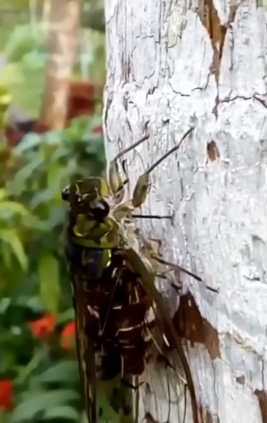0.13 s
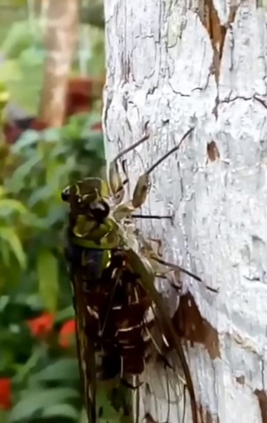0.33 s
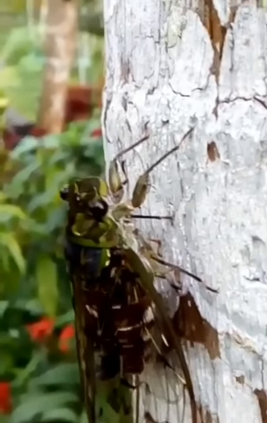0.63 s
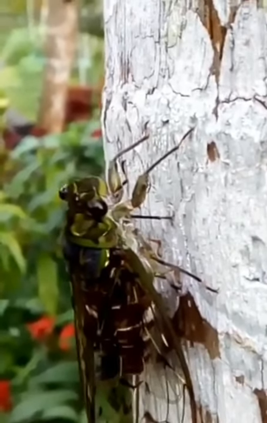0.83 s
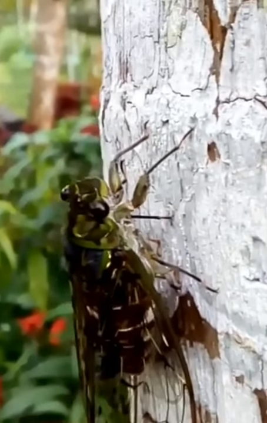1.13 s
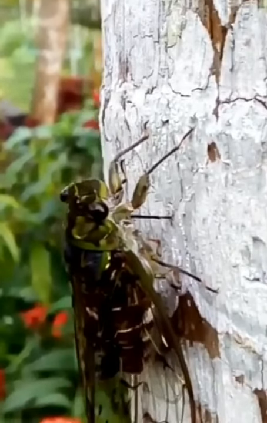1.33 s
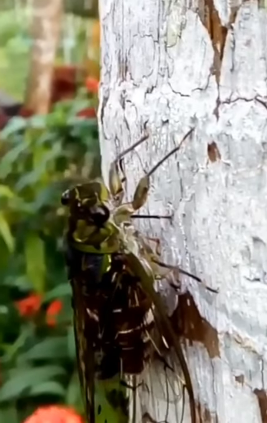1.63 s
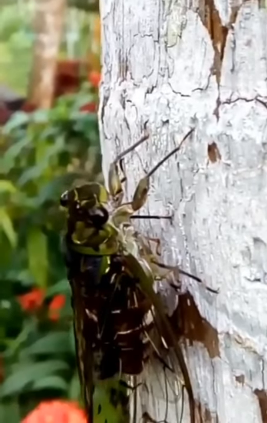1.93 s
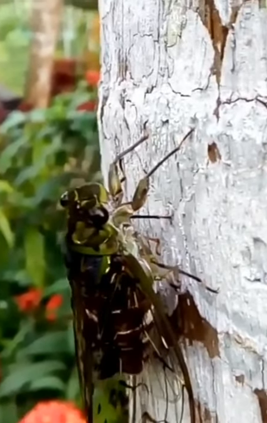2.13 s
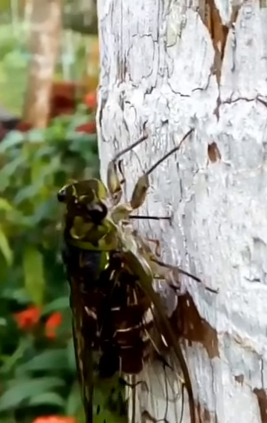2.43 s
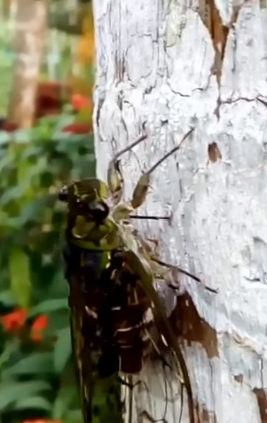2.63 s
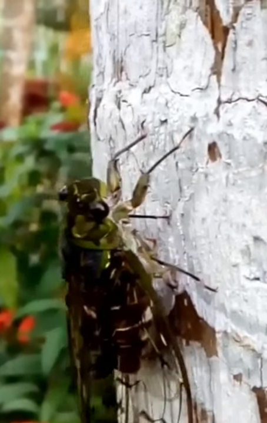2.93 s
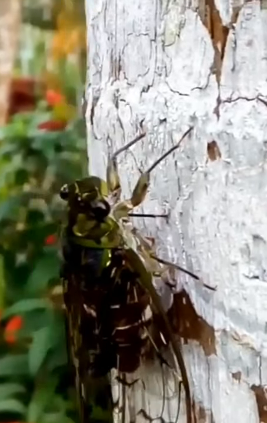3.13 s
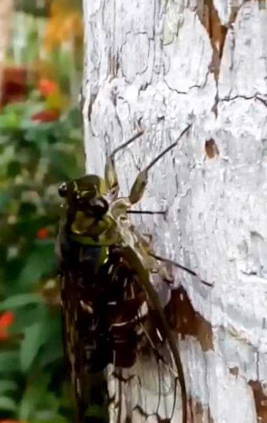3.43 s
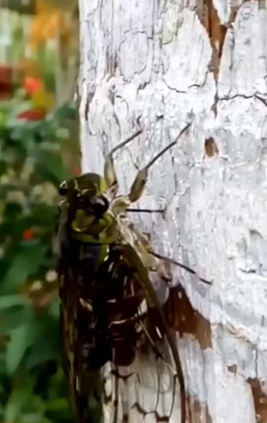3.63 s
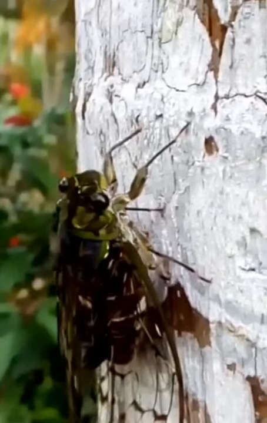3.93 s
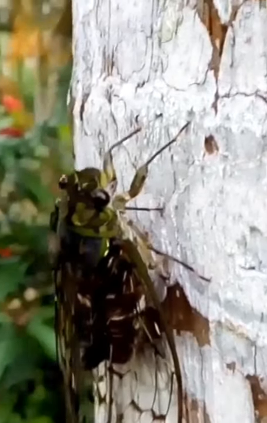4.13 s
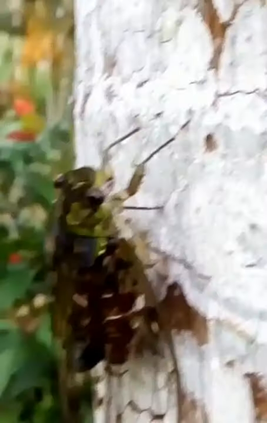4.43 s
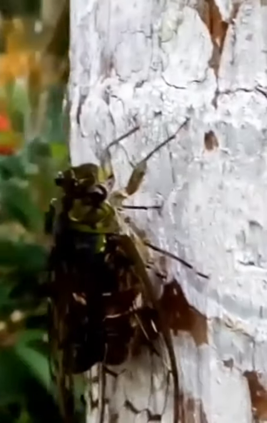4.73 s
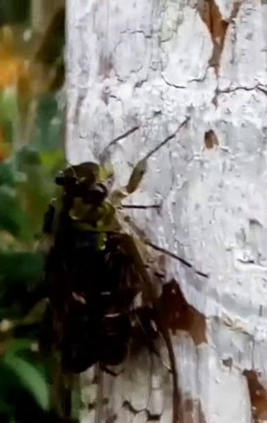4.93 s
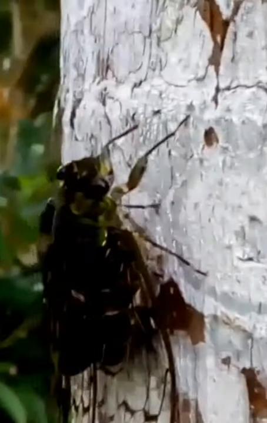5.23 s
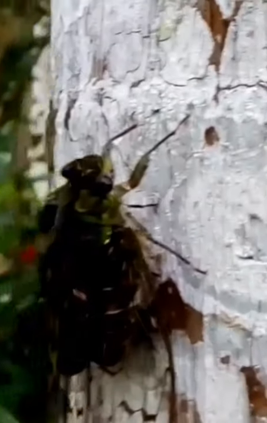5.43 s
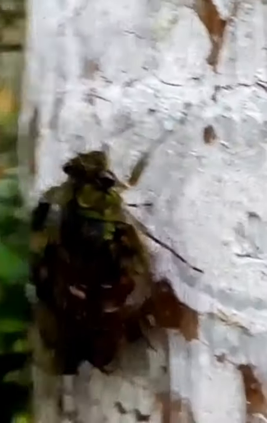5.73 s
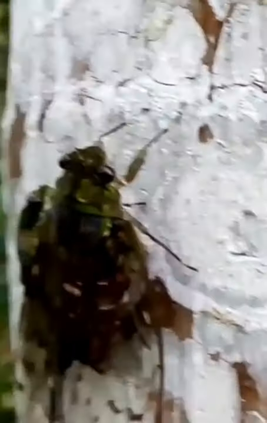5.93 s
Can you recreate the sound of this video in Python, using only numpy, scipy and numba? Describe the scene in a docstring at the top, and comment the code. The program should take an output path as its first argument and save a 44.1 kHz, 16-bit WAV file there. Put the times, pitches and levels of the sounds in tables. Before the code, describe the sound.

A large cicada very close by rasps a loud, harsh pulsing buzz, stuttering at first, then steady phrases with tiny rests, in a garden.

```python
"""First a few stuttering bursts, then long rasping phrases with short rests: a large cicada on a tree trunk,
a hand's width from a phone's two microphone ports and nearer the right one, as the phone moves round the trunk.
Each tymbal stroke buckles three ribs and snaps back, ringing body modes, low ones first; hissy treble noise
pulses along. Under it lie a faint garden floor of shaped noise and a wavering hum; in some rests a neighbour's
faster clicks ring a gliding resonance. Bark and leaves scatter both songs."""
import sys
import numpy as np
from scipy import signal
from scipy.fft import rfft, irfft
from scipy.io import wavfile
from scipy.ndimage import uniform_filter1d
from numba import njit

SR = 44100
rng = np.random.default_rng(int(sys.argv[2]) if len(sys.argv) > 2 else 0)


def unload_wav(signal):
    """Save mono or channel-first audio to the path in sys.argv[1] as 16-bit WAV at rate SR, clipped to [-1, 1]."""
    wavfile.write(
        sys.argv[1],
        SR,
        np.round(np.clip(np.atleast_2d(signal).T, -1, 1) * 32767).astype(np.int16),
    )


N = 268039  # samples


def undb(db):
    """Amplitude factor of a level in dB."""
    return 10 ** (np.asarray(db) / 20)


def unit(x):
    """Scale to an rms of 1."""
    return x / np.sqrt(np.mean(x ** 2))


@njit
def svf(x, hz, width):
    """Band-pass whose centre may move every sample."""
    y, band_state, low_state = np.empty(len(x)), 0., 0.
    for i in range(len(x)):
        g, k = np.tan(np.pi * hz[i] / SR), width / hz[i]
        v = (band_state + g * (x[i] + 1e-18 - low_state)) / (1 + g * (g + k))
        band_state = 2 * v - band_state
        low_state += 2 * g * v
        y[i] = k * v
    return y


def ring(x, hz, width):
    """A resonance applied twice: soft attack, dark skirts."""
    hz = hz + np.zeros(len(x))
    once = svf(x, hz, 1. * width)
    return svf(once, hz, 1. * width)


def band(x, lo_hz, hi_hz):
    """Keep what lies between two frequencies."""
    return signal.sosfilt(signal.butter(3, [lo_hz, hi_hz], "band", fs=SR, output="sos"), x)


def clicks(s, size):
    """Impulses at the given seconds."""
    out, at = np.zeros(N), np.round(s * SR).astype(int)
    keep = (at >= 0) & (at < N)
    np.add.at(out, at[keep], size[keep])
    return out


def wander(rate):
    """Random levels, rate of them a second, joined by slopes; spread near 1."""
    k = int(SR / rate)
    steps = np.repeat(rng.standard_normal(N // k + 1), k)
    return 0.89 * uniform_filter1d(steps, k)[:N]


# Phone's place round the trunk: t/s, share of the turn/0-1, gain of the left port/dB,
# level of the three rasp bands/dB (three columns), extra rasp at the left port/dB
PHONE_PATH = [(0, 0, -8.5, -46, -39.5, -53, -2), (.8, 0.22, -7, -52, -41.5, -58, 1),
              (1.7, 0.27, -7.5, -49, -43.5, -55, -1), (2.3, 0.416, -6.5, -49.5, -44.5, -54, -2),
              (3, 0.4, -6.5, -50.5, -48, -61, -0.5), (3.4, 0.63, -6, -47, -47, -57, 1),
              (3.9, 0.62, -8, -52, -50.5, -62, 4), (4.6, 0.79, -7, -45, -51.5, -60, 4),
              (5, 0.45, -8.5, -52, -50.5, -58, 4.5), (5.45, 0.98, -8.5, -49, -53.5, -52, -2),
              (5.65, 0.66, -8, -53, -59, -49, -12.5), (6.05, 1, -7.5, -46, -62, -42, -17.5)]
# Song phrases: first stroke t/s, last stroke t/s, strokes/count, hesitation before the last stroke/ms,
# strength/dB, abdomen lift at the start/0-1, level change by the end/dB
SONG_PHRASES = [(0.0052, 0.0301, 5, 0, 0, .9, -2), (0.0763, 0.0851, 2, 0, 1, .6, 0),
                (0.1186, 0.2543, 20, 0, -1, .15, 1), (0.2641, 0.2868, 4, 0, 0, 1, 2),
                (0.3008, 0.3008, 1, 0, -1, .9, 0), (0.3149, 0.3452, 5, 1, -1, .9, -2),
                (0.372, 0.3835, 2, 0, 0, .6, 0), (0.4204, 0.5413, 18, 0, -1.5, .2, 0),
                (0.5498, 0.6657, 15, 0, -1, 1, 2), (0.7324, 0.9106, 25, 2.2, 0, 0, 0),
                (0.9708, 1.1312, 23, 0, .5, 0, -2), (1.1947, 1.3182, 18, 0, 0, 0, 1),
                (1.3272, 1.3888, 9, 0, 0, 1, 1), (1.4515, 1.5963, 21, 0, 0, 0, 0),
                (1.662, 1.906, 35, 0, -.5, 0, 2), (1.9579, 2.1288, 25, 0, 1.5, 0, -1),
                (2.1869, 2.3812, 28, 3, 1.5, 0, 0), (2.4312, 2.5798, 22, 0, 1, 0, 0),
                (2.637, 2.8245, 27, 2.3, 1, 0, -1), (2.873, 3.0517, 26, 0, 0, 0, 0),
                (3.1069, 3.2657, 23, 1.5, 0, 0, 1), (3.3102, 3.4827, 25, 2.6, 1.5, .2, -2),
                (3.5311, 3.7045, 25, 2.1, 1, 0, -1), (3.758, 3.9136, 23, 0, 0, 0, 0),
                (3.9742, 4.1434, 25, 0, -1, 0, 2), (4.2012, 4.3758, 26, 0, 0, 0, .5),
                (4.4337, 4.6024, 25, 0, 0, 0, 1), (4.6613, 4.8381, 26, 2.2, 1, .1, -2),
                (4.8898, 5.0861, 29, .8, .5, 0, 0), (5.1345, 5.3026, 25, .7, .5, 0, 0),
                (5.3556, 5.5239, 25, .3, 1, 0, 2), (5.5728, 5.7308, 24, 0, -.5, .6, 0),
                (5.7847, 5.9655, 27, .5, 1, 0, 1), (6.0177, 6.0736, 9, 0, 0, 0, 0)]
# Swell through a phrase, a row each for low, middle, high, upper and edge modes:
# time to the peak/s, level at start/dB, at peak/dB, at end/dB
PHRASE_SWELL = [(0.041, -16.5, -15, -16), (.045, -34, -21, -21.5), (0.079, -36.5, -21.5, -23),
                (0.063, -41.5, -30.5, -32.5), (0.061, -37.5, -28.5, -30)]
# What those modes gain at a full turn round the trunk: level at start/dB, at peak/dB, at end/dB
TURN_GAIN = [(-2, -2.5, -12.5), (14.5, 4, 0), (7, 4.5, 4.5), (2, 9.5, 12.5), (14.5, 3.5, -8.5)]
LIFT_S = 0.025  # time the abdomen takes to lift
SLOW_START = 1.07  # stretch of the first two stroke gaps


def strokes():
    """The muscle starts a little slow and may hesitate before the last stroke, while the abdomen lifts.

    Rows, one column a stroke: t/s, lift/0-1, five mode groups/dB, left port gain/dB, three rasp bands/dB."""
    phrases, (when, *phone) = [], np.transpose(PHONE_PATH)
    for first, last, n, late_ms, db, lifted, fade_db in SONG_PHRASES:
        gaps = np.ones(round(n))
        gaps[1:3], gaps[0] = SLOW_START, 0
        steady_s = last - first - late_ms / 1000
        since = np.cumsum(gaps) / max(gaps.sum(), 1) * steady_s
        since[-1] = last - first
        s = first + since
        turn, pan_db, *rasp_db, _ = (np.interp(s, when, column) for column in phone)
        group_db = []
        for (peak_s, *swell), gain in zip(PHRASE_SWELL, TURN_GAIN):
            start, top, end = np.add(swell, turn[0] * np.array(gain))
            rise = np.minimum(lifted + since / peak_s, 1)
            peak_s = peak_s * (1 - min(lifted, 1))  # a lifted start peaks sooner
            fall = np.clip((since - peak_s) / max(since[-1] - peak_s, LIFT_S), 0, 1)
            group_db.append(db + start + rise * (top - start) + fall * (end + fade_db - top))
        lift = np.minimum(lifted + since / LIFT_S, 1)
        phrases.append([s, lift, *group_db, pan_db, *(db + np.array(rasp_db))])
    return np.hstack(phrases)


# Three ribs of one stroke, then the snap back: time from the stroke t/ms,
# drive level of the low, middle, high, upper and edge modes/dB (five columns)
RIB_CLICKS = [(-1.75, -16, -12, -18, -18, -10), (-.95, 0, 0, -6, -7, -2), (-.22, -9, -6, 0, 0, 0),
              (3.1, -15, -16, -21, -20, -11)]
# Body modes in the same five groups: f/Hz, width/Hz, level/dB, left port level/dB,
# signed gain left, signed gain right, share of pitch gained as the abdomen lifts
BODY_MODES = [
    [(1472, 497, 19, 2, 0.59, 0.55, -0.057), (2051, 603, 25, 9, -0.79, -1.625, -0.041),
     (2340, 400, 35, 1.5, 1, 1, -.03)],
    [(2953, 540, 29.5, 10, -0.43, -2, 0.0055)],
    [(3775, 1170, 32, 1.5, -1.16, 1, 0.057), (4220, 610, 32.5, -5, -0.29, -1.47, 0.069)],
    [(4968, 814, 34, 0, 0.98, 1, 0.016)],
    [(5880, 1440, 20, -2, -0.71, -2.5, 0.047), (6410, 810, 26, -1, 1, 1, 0.045)],
]
HIGH_LEAD = 1  # samples by which the high, upper and edge modes reach the left port sooner


def tymbal(s, lift, group_db, singing):
    """Rib clicks and a crackle of the membrane drive the body modes; no two strokes load them alike."""
    t, shape = np.arange(N) / SR, (len(RIB_CLICKS), len(s))
    lift = np.interp(t, s, lift)
    slips_ms = .045 * rng.standard_normal(shape)
    out = np.zeros((2, N))
    for g, modes in enumerate(BODY_MODES):
        effort = undb(np.interp(t, s, group_db[g]) - 32) * singing
        for hz, width, db, left_db, left, right, glide in modes:
            pitch = hz * (1 + glide * lift + 0.011 * wander(25))
            shared_db = 1.6 * rng.standard_normal(shape)
            for side, gain in enumerate((left * undb(left_db), right)):
                # each port faces another part of the membrane
                load_db = shared_db + 1.1 * rng.standard_normal(shape)
                drive = np.zeros(N)
                for (time_ms, *rib_db), slip_ms, rib_load_db in zip(RIB_CLICKS, slips_ms, load_db):
                    size = undb(group_db[g] + rib_db[g] + rib_load_db)
                    drive += clicks(s + (time_ms + slip_ms) / 1000, size)
                crackle = effort * rng.standard_normal(N)
                body = gain * undb(db) * ring(drive + crackle, pitch, width)
                out[side] += np.roll(body, -HIGH_LEAD * (g > 1 and side == 0))
    return out


def shadow(left):
    """A dip that deepens at the left port with the phone's turn, made by subtracting a band."""
    when, turn, *_ = np.transpose(PHONE_PATH)
    depth = np.minimum(1.08 * np.interp(np.arange(N) / SR, when, turn), 1)
    return left - depth * svf(left, np.full(N, 4170.), 820.)  # centre, width in Hz


# Treble rasp: f/Hz, width/Hz, level/dB, left port level/dB, index of the phone's rasp band that sets its level
RASP_BANDS = [(7240, 1700, 3.5, -22, 0), (8570, 1300, -1, -34.5, 0), (10000, 2300, -5.5, -39.5, 1),
              (10970, 1200, -8, -36, 1), (11790, 4300, -8, -19, 1), (13600, 1500, -14, -10, 1),
              (14650, 2100, -1.5, -5.5, 2), (15200, 1500, -11, 3, 2)]


def rasp(s, stroke_rasp_db, pan, singing):
    """Hissy treble noise above 7 kHz pulses with the strokes over a steadier hiss, unrelated at the two ports."""
    t, out = np.arange(N) / SR, np.zeros((2, N))
    when, *_, left_rasp_db = np.transpose(PHONE_PATH)
    left_drift_db = np.interp(t, when, left_rasp_db)
    for hz, width, db, left_db, which in RASP_BANDS:
        rasp_db = db + stroke_rasp_db[round(which)]
        scatter_db = 3.5 * rng.standard_normal(len(s))
        pulses = clicks(s - .003, undb(rasp_db + scatter_db))
        gate = np.convolve(pulses, np.hanning(211))[:N]
        gate += 0.73 * singing * undb(np.interp(t, s, rasp_db))  # the steadier hiss
        gate *= undb(4.7 * wander(20))
        out[1] += gate * unit(ring(rng.standard_normal(N), hz, width))
        # divided by pan, since cicada() applies pan to the whole left port
        left_gain = undb(left_db + left_drift_db) / pan
        out[0] += gate * left_gain * unit(ring(rng.standard_normal(N), hz, width))
    return out


# Sharp ticks: t/s, level before the band-pass/dB
SHARP_TICKS = [(.18, -14), (2.2563, -3), (2.7325, -5), (5.9384, -14), (5.9594, -16)]


def ticks():
    """Single impulses kept to the treble, a fifth as strong into the left port."""
    at, db = np.transpose(SHARP_TICKS)
    return band(clicks(at, undb(db)), 4300, 14500) * np.array([[.2], [1]])


LEFT_LAG = 9  # samples by which the song reaches the left port later
# samples by which the crackle's window, centred on the strokes, is shifted later;
# it opens just before a phrase and outlasts it slightly
CRACKLE_SHIFT = 60


def cicada():
    """The near song: strokes ring the body, with rasp and ticks on top, later at the far left port."""
    s, lift, *group_db, pan_db, rasp_0, rasp_1, rasp_2 = strokes()
    s = s + .0001 * rng.standard_normal(len(s))
    # 1 while strokes follow closely, 0 in the rests
    singing = np.minimum(uniform_filter1d(clicks(s, np.ones(len(s))), 360) * 360, 1)
    singing = np.roll(singing, CRACKLE_SHIFT)
    pan = undb(np.interp(np.arange(N) / SR, s, pan_db))
    out = tymbal(s, lift, group_db, singing)
    out[0] = shadow(out[0])
    out += rasp(s, (rasp_0, rasp_1, rasp_2), pan, singing) + ticks()
    out[0] = np.roll(out[0] * pan, LEFT_LAG)
    return out


# Colour of the garden air: f/Hz, relative level/dB per Hz
AIR_COLOUR = [(20, -14), (70, -18), (300, -24), (550, -31.5), (800, -25.5), (1300, -10), (2200, 1.5),
              (4400, -3), (7000, -14), (15500, -37)]
AIR_DB = -42  # rms at the right port, as it enters the mix
# Wavering hum: f/Hz, width/Hz, rms level before the slow rise and port gains/dB
HUM_BANDS = [(48.3, 17, -74.5), (101.7, 10, -80.5)]


def garden():
    """Faint coloured air, unrelated at the ports, over narrow noise bands that waver as a slowly growing hum."""
    hz, db = np.transpose(AIR_COLOUR)
    f = np.arange(N // 2 + 1) * SR / N + 1
    colour = undb(np.interp(np.log(f), np.log(hz), db))
    air = irfft(rfft(rng.standard_normal((2, N))) * colour, N)
    hum = sum(undb(level) * unit(ring(rng.standard_normal(N), h, width)) for h, width, level in HUM_BANDS)
    hum = hum * undb(np.linspace(-2.5, 2.5, N)) * undb([[-3], [3]])
    return unit(air) * undb([[AIR_DB - 1.5], [AIR_DB]]) + hum


# Neighbour's buzz where it stands out: start t/s, end t/s, relative click level/dB,
# ring f/Hz at start, at end
NEIGHBOUR_BUZZ = [(0.674, 0.692, -45, 2570, 2620), (0.697, 0.733, -32.5, 2810, 2440),
                  (1.149, 1.19, -49, 2780, 2400), (1.424, 1.448, -47, 2760, 2400),
                  (1.91, 1.943, -39.5, 2850, 2650), (2.85, 2.873, -43, 2670, 2200),
                  (3.066, 3.098, -36.5, 2900, 2700), (3.272, 3.306, -38, 2800, 3900),
                  (3.93, 3.973, -47, 2830, 2400), (4.16, 4.197, -50, 2920, 2560),
                  (4.864, 4.886, -47, 2800, 2600), (5.314, 5.348, -34.5, 2970, 2600)]
NEIGHBOUR_LAG = 3  # samples by which it reaches the left port later


def neighbour():
    """Faster, steadier clicks ring one gliding resonance, mostly sinking, and another an octave above."""
    table = np.array(NEIGHBOUR_BUZZ)
    s = [np.arange(start, end, 1 / 288) for start, end in table[:, :2]]  # 288 clicks a second
    db = np.repeat(table[:, 2], [len(buzz) for buzz in s])
    pitch = np.interp(np.arange(N) / SR, table[:, :2].ravel(), table[:, 3:].ravel())
    drive = clicks(np.concatenate(s), undb(db + 3.1 * rng.standard_normal(len(db))))
    buzz = undb(40.5) * ring(drive, pitch, 355) + undb(24) * ring(drive, 2 * pitch, 900)
    return np.array([undb(2.0) * np.roll(buzz, NEIGHBOUR_LAG), buzz])


def tail(t60):
    """Dense scatter from bark and leaves, unit energy; t60 is its 60 dB decay in seconds."""
    t = np.arange(int(t60 * SR)) / SR
    h = rng.standard_normal(len(t)) * undb(-60 * t / t60)
    return h / np.sqrt(np.sum(h ** 2))


def scene():
    """Both songs, their scatter unrelated at the two ports, and the garden."""
    near, floor, far = cicada(), garden(), neighbour()
    far_send = undb(-10) * far[1]
    wet = []
    for near_db in (-5, 0):  # left, right
        send = undb(-15.5) * near[1] * undb(near_db) + far_send
        wet.append(signal.fftconvolve(send, tail(0.18))[:N])
    return near + far + np.array(wet) + floor


TOP_HZ = 15800  # upper limit of the phone's sound


def record(dry):
    """The capsules rectify a little, leaving the stroke rate in the bass; an expander sinks the rests.

    Peaks then round off and the top is cut."""
    bass = np.array([ring(port ** 2, 178, 65) for port in dry]) * undb(np.linspace(-8, 0, N))
    x = dry + undb([[-25], [-27]]) * bass
    loud_db = 10 * np.log10(uniform_filter1d(np.mean(x ** 2, axis=0), 900) + 1e-12)
    x = x * undb(0.24 * np.minimum(loud_db + 21.5, 0))  # 0.24 dB down per dB below -21.5 dB
    x = np.tanh(x / 1.3) * 1.3
    return signal.sosfilt(signal.ellip(10, .2, 100, TOP_HZ, fs=SR, output="sos"), x)


dry = scene()
out = record(dry)
unload_wav(out)
```